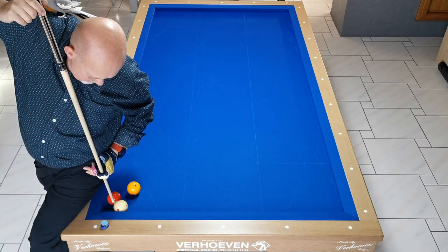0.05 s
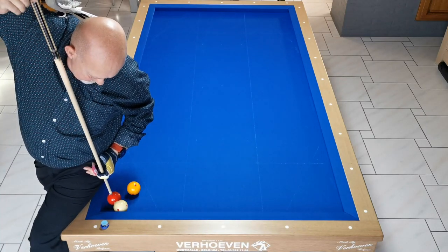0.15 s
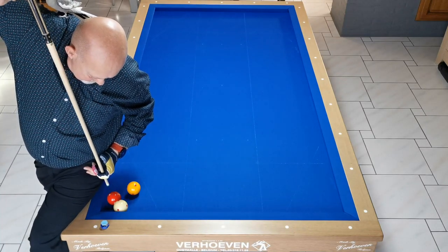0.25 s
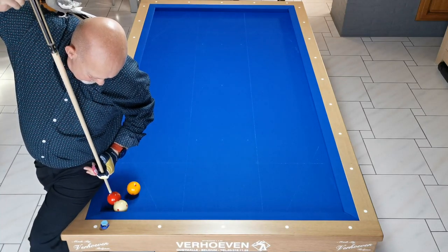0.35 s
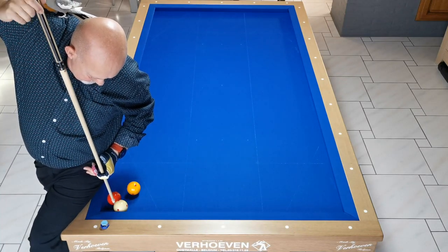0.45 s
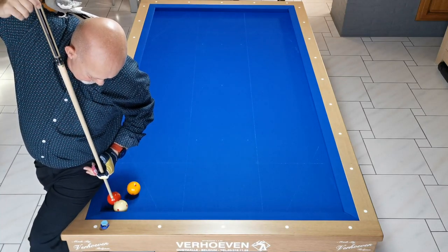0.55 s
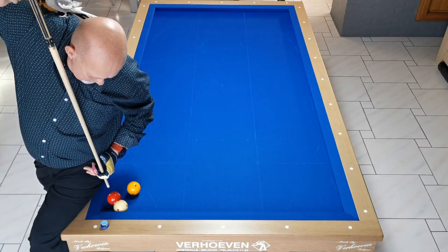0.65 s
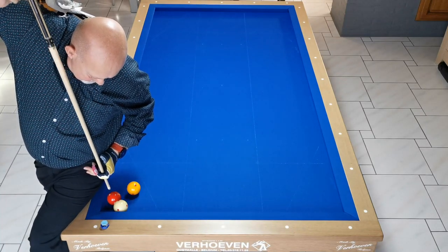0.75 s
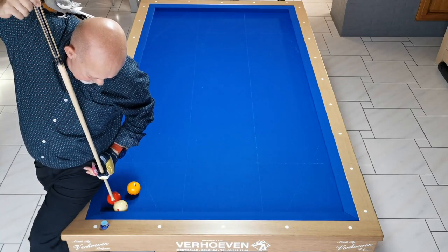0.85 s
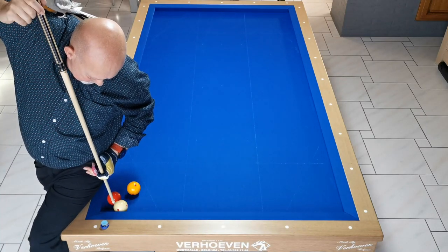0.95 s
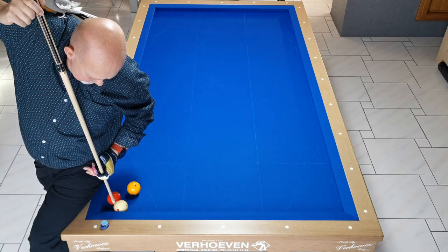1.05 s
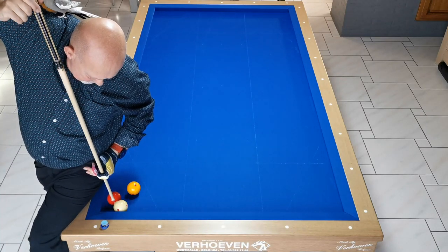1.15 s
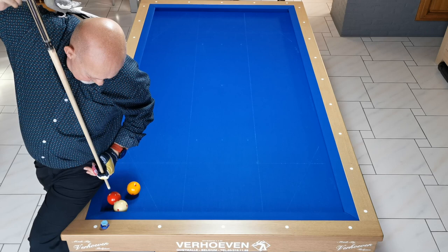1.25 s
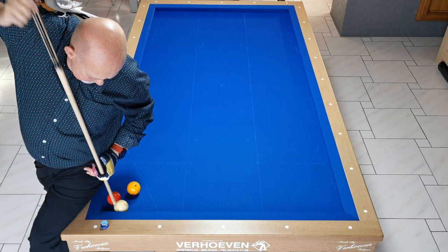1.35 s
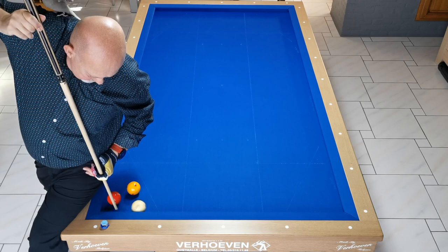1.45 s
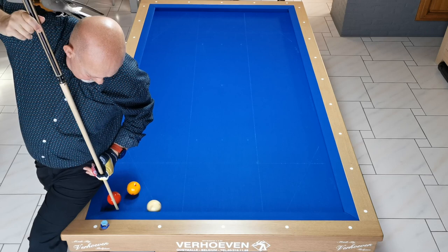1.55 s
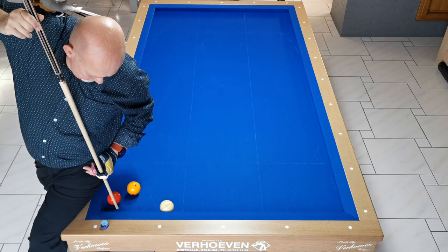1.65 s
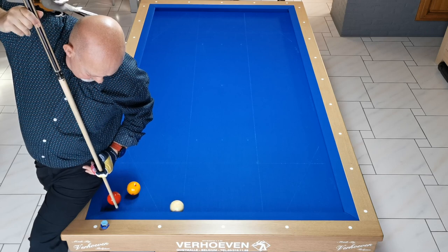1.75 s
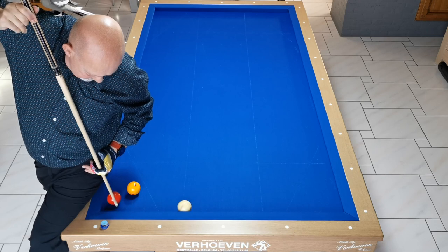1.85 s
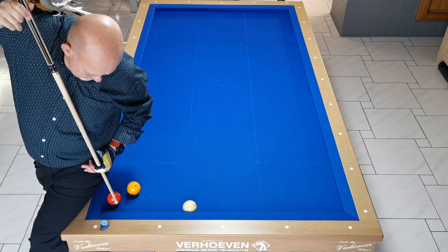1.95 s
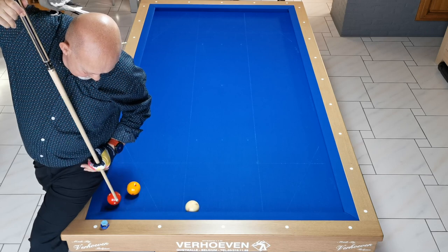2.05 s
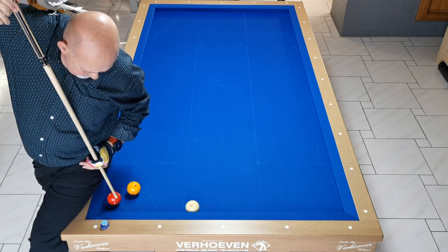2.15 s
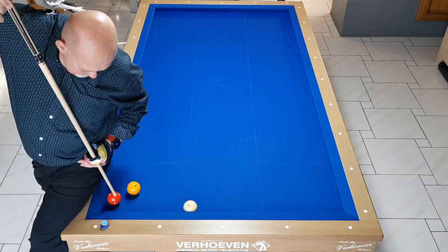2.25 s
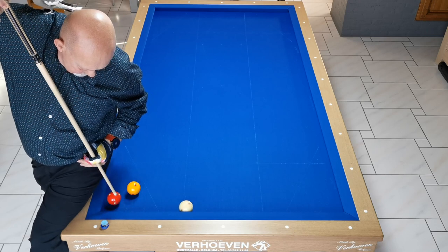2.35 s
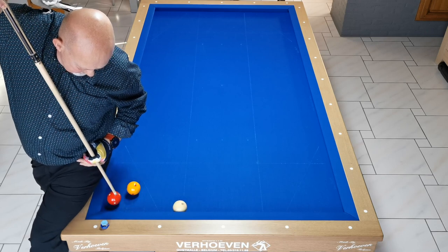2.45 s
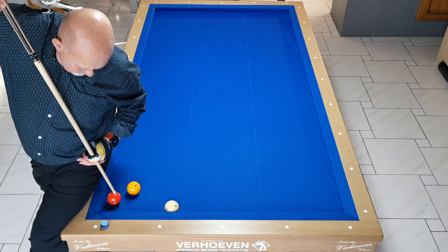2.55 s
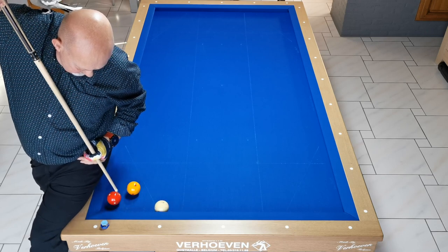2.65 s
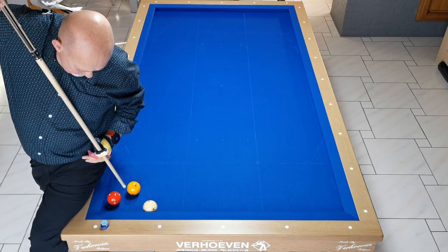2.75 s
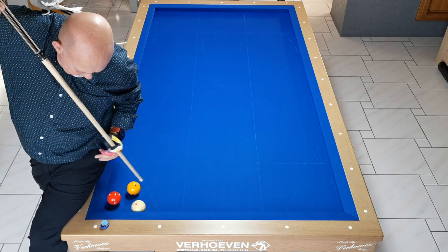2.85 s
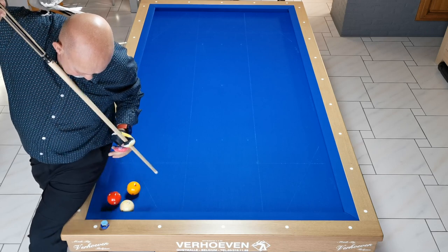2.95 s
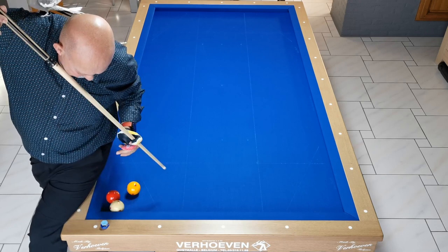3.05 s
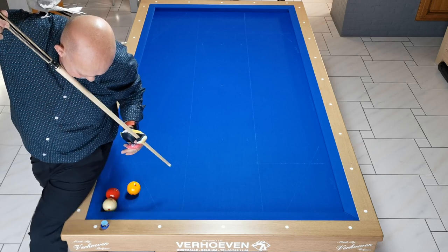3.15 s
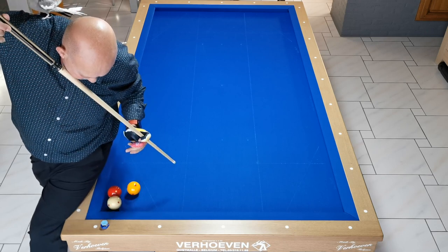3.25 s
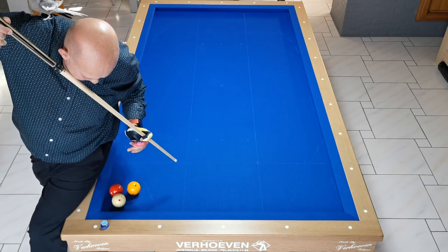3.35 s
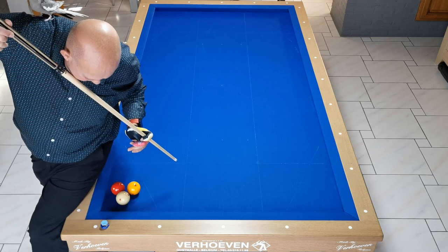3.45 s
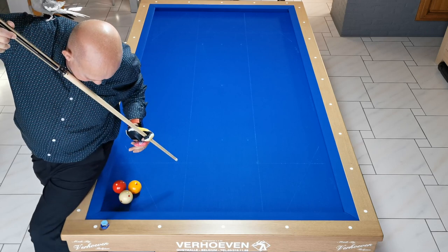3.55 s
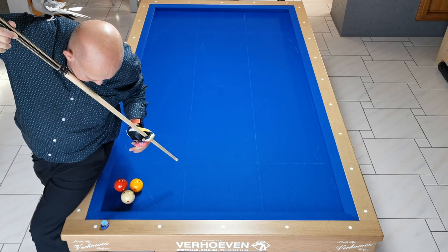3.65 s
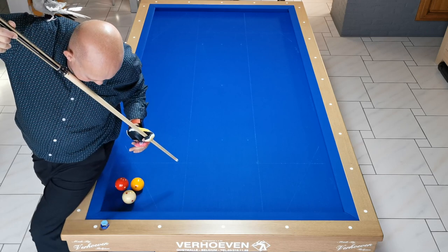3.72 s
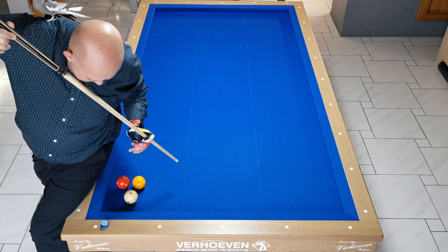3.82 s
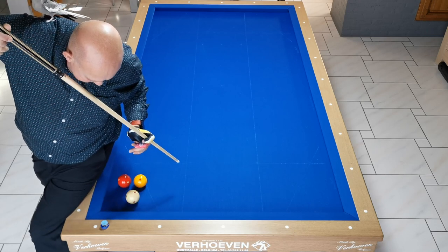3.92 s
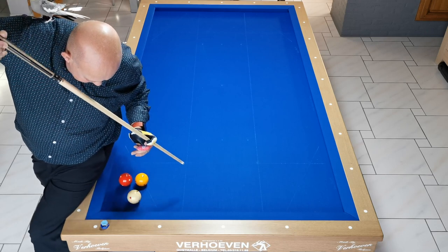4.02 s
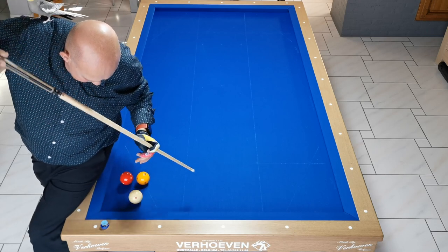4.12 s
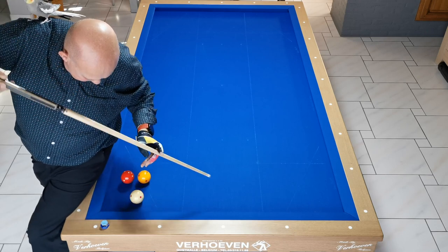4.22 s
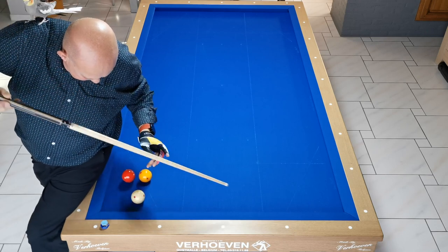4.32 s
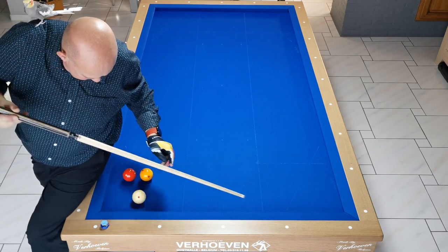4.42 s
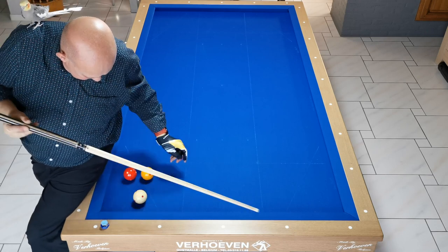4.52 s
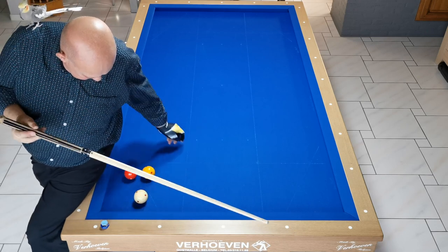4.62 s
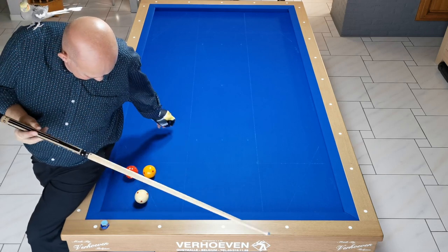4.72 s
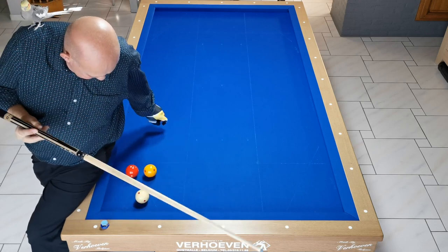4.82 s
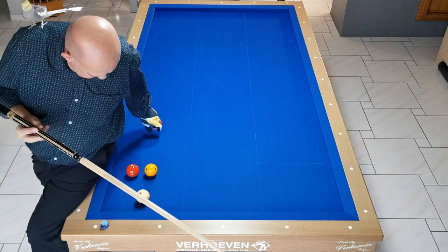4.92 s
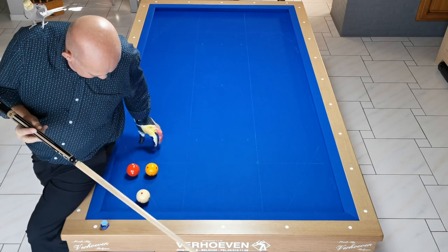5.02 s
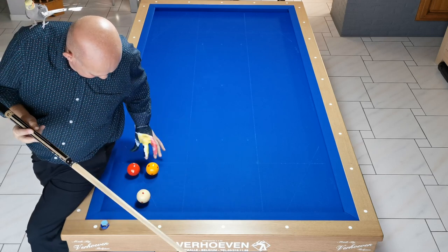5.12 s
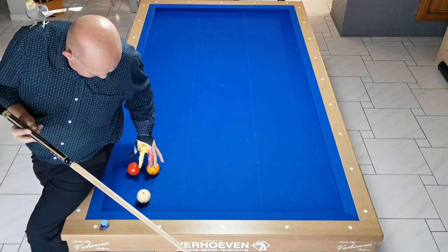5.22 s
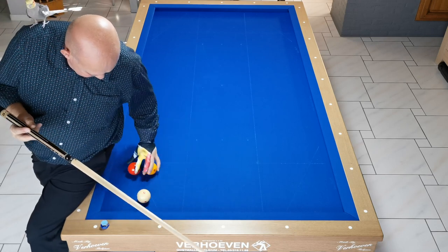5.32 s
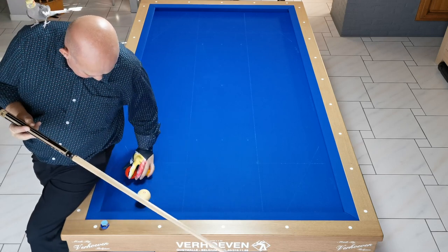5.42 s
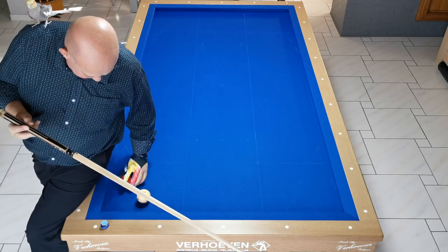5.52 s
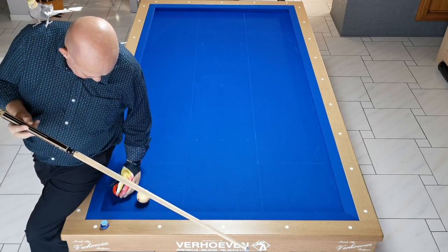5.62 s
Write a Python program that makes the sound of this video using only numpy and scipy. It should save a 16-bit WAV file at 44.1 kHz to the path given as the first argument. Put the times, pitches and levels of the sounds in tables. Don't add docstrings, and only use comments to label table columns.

```python
import sys
import numpy as np
from scipy import signal
from scipy.fft import rfft, irfft
from scipy.io import wavfile

SR = 44100
rng = np.random.default_rng(int(sys.argv[2]) if len(sys.argv) > 2 else 0)


def to_wav(sig):
    pcm = np.clip(np.atleast_2d(sig), -1, 1) * 32767
    pcm = np.round(pcm).astype(np.int16)
    wavfile.write(sys.argv[1], SR, pcm.T)


def level_to_linear(level):
    exponent = np.asarray(level, float) / 20
    return 10 ** exponent


N = 250488


def at_hz(points, hz):
    table_hz, values = np.array(points).T
    return np.interp(np.log(hz), np.log(table_hz), values)


def band(x, low_hz, high_hz, order=2):
    edges_hz = [low_hz, min(high_hz, .45 * SR)]
    return signal.sosfilt(signal.butter(order, edges_hz, "band", fs=SR, output="sos"), x)


def strike(times, levels_db):
    x = np.full(N, 1e-18)
    x[(np.asarray(times) * SR).astype(int)] = level_to_linear(np.asarray(levels_db))
    return x


def ring(clicks, modes):
    out = 0
    for k, (hz, level_db, t60) in enumerate(modes):
        decay = level_to_linear(-60 / (t60 * SR))
        turn = 2 * np.pi * hz / SR
        start = (-1) ** k * level_to_linear(level_db) * np.sin(turn)
        out = out + signal.lfilter([0, start], [1, -2 * decay * np.cos(turn), decay * decay], clicks)
    return out


def burst(s, level_db, low_hz, high_hz, t60):
    t = np.arange(N) / SR - s
    envelope = (t > 0) * level_to_linear(level_db - 60 * np.abs(t) / t60)
    return band(rng.standard_normal(N) * envelope, low_hz, high_hz, order=3)


def drift(rate):
    r = np.exp(-2 * np.pi * rate / SR)
    slow = signal.lfilter([1], [1, -2 * r, r * r], rng.standard_normal(N + SR))[SR:]
    return slow / slow.std()


def stereo_noise(count, spectrum):
    # f/Hz, likeness/0..1
    likeness = [(60, 1), (180, 1), (550, 0.24), (1650, 0.0712), (4970, 0.036), (15000, 0.034)]
    # f/Hz, level/dB
    lean = [(60, 3), (180, 3), (550, -1.5), (1650, -2.5), (4970, 2), (15000, -6)]
    hz = np.maximum(np.arange(count // 2 + 1) * SR / count, 1)
    mid, side = rfft(rng.standard_normal((2, count)))
    alike = np.clip(at_hz(likeness, hz), 0, 1)
    pair = np.sqrt(1 + alike) * mid + np.sqrt(1 - alike) * side * [[1], [-1]]
    colour_db = at_hz(spectrum, hz) + at_hz(lean, hz) * [[.5], [-.5]]
    out = irfft(pair * level_to_linear(colour_db), count)
    return out / out.std()


def room(x, wet_db, walls_db, linger=0.69, build_s=0.0028):
    # f/Hz, t60/s
    room_t60 = [(60, 0.2), (130, 0.6), (300, 0.47), (700, 0.55), (1500, 0.53), (3000, .6), (6000, 0.46),
                (10000, 0.34), (13000, .24), (16000, .15)]
    # delay/s, level/dB
    walls = [(.0065, 7), (.013, -25.5), (0.033, -19.5)]
    flat_noise = stereo_noise(SR, [(20, 0), (20000, 0)])
    hz, t, cells = signal.stft(flat_noise, SR, nperseg=1024)
    fading = cells * level_to_linear(-60 * t / linger / at_hz(room_t60, hz + 1)[:, None])
    tail = signal.istft(fading, SR, nperseg=1024)[1][:, :SR]
    tail = level_to_linear(wet_db) * tail * (1 - np.exp(-np.arange(SR) / SR / build_s))
    for delay, level_db in walls:
        for port in (0, 1):
            arrival = int((delay + rng.uniform(0, .0006)) * SR)
            tail[port, arrival] += level_to_linear(level_db + walls_db + rng.normal(0, 1.6))
    return signal.fftconvolve(x[None], tail, axes=1)[:, :N]


def direct(x, pan_db):
    late = np.interp(np.arange(N) - 0.00015 * SR, np.arange(N), x)
    return np.array([x * level_to_linear(pan_db / 2), late * level_to_linear(-pan_db / 2)])


def background():
    # f/Hz, level/dB
    mains = [(100, -64), (200, -85.5), (238, -85), (300, -85.5)]
    # f/Hz, level/dB per Hz
    air = [(15, -21.5), (21, 1.5), (32, -9.5), (46, -2), (58, -10.5), (72, -21), (140, -14.5), (270, -25.5),
           (310, -20.5), (500, -29.5), (1000, -33.5), (3000, -38), (11000, -42), (14500, -44), (16000, -55)]
    t = np.arange(N) / SR
    hum = sum(np.sqrt(2) * level_to_linear(level_db + 1.0 * drift(4.36)) * np.sin(2 * np.pi * hz * t)
              for hz, level_db in mains)
    return level_to_linear(-65) * stereo_noise(N, air) + direct(hum, 7.)


def small_noises():
    # t/s, level/dB
    tick_events = [
        (1.4359, -49),
        (1.445, -65),
        (4.576, -68),
    ]
    # f/Hz, level/dB, t60/s
    shaft = [(2600, -11, 0.0076), (3402, -6.5, 0.00499), (4992, -1.5, .003), (7200, -2.5, 0.0055),
             (8850, 1, .014), (11100, -2, 0.0068), (12490, -9.5, .008), (15000, -3.5, .002)]
    # t/s, level/dB, low f/Hz, high f/Hz, t60/s
    knock_events = [
        (.454, -44, 480, 830, .25),
        (.988, -50, 260, 480, .1),
    ]
    # t/s, length/s, level at full speed/dB
    strokes = [(-.1, 0.22, -79.5), (.17, 0.26, -76.5), (0.41, 0.25, -76), (0.629, .19, -78.5),
               (0.854, .22, -78), (1.259, .2, -80), (1.435, 0.055, -61.5), (2.741, 0.66, -74),
               (3.063, 0.37, -70), (3.326, 0.37, -73.5), (3.607, .25, -77), (4.17, 0.43, -77),
               (4.524, 0.59, -77.5), (5.08, .42, -82)]
    # f/Hz, level/dB per Hz
    slide_colour = [(1000, -1.5), (2000, 0), (3500, -0.5), (5000, 3), (7000, -3), (9000, -2), (11000, -0.5),
                    (14000, -23)]
    ticks = level_to_linear(8.0) * ring(strike(*np.transpose(tick_events)), shaft)
    knocks = sum(burst(*row) for row in knock_events)
    t, speed = np.arange(N) / SR, 0
    for s, length, level_db in strokes:
        done = np.clip((t - s) / length, 0, 1)
        speed = speed + level_to_linear(level_db) * np.abs(np.sin(np.pi * done)) ** 1.2
    flicker = level_to_linear(1.5 * drift(15))
    slide = speed * stereo_noise(N, slide_colour) * flicker
    near = direct(ticks + knocks, 6.1)
    return near + room(ticks + 2 * knocks, wet_db=-32.5, walls_db=-9.5) + slide


def chirps():
    # t/s, length/s, first f/Hz, last f/Hz, level/dB
    note_events = [
        (2.944, .095, 1510, 1940, -58),
        (3.039, .045, 1509, 1280, -56),
        (3.912, .106, 1446, 2370, -53),
    ]
    # f/Hz, level/dB
    chirp_colour = [(900, 10), (1300, 3), (2300, 0), (3000, 0.5), (4500, 0), (6000, -7.5), (7300, -3),
                    (9000, -7), (11000, -1.5), (13000, -21)]
    attack_s, release_s = 0.0072, 0.015
    swell_db_per_oct, grow_db = 10, 6
    overtone_db_per_oct, thinning_db_per_oct = -2, -23
    t, voice = np.arange(N) / SR, 0
    waver = 1 + .028 * drift(130)
    flutter = level_to_linear(3.5 * drift(80))
    rasp = band(rng.standard_normal(N), 2600, 10200)
    for s, length, first_hz, last_hz, level_db in note_events:
        falling = last_hz < first_hz
        progress = (t - s) / length
        hold = .42 if last_hz > first_hz else .02
        done = np.clip((progress - hold) / (1 - hold), 0, 1)
        glide = np.log2(last_hz / first_hz) * np.sin(np.pi / 2 * done) ** 2
        slope_db = overtone_db_per_oct + thinning_db_per_oct * np.abs(glide)
        if falling:
            slope_db = slope_db - 9 * done
        gate = np.clip(np.minimum((t - s) / attack_s, (s + length - t) / release_s), 0, 1)
        pitch = first_hz * 2 ** glide * waver
        phase = 2 * np.pi * np.cumsum(pitch) / SR
        stack = 0
        for k in range(1, 10):
            overtone_db = slope_db * np.log2(k) + at_hz(chirp_colour, k * pitch)
            stack = stack + level_to_linear(overtone_db) * np.sin(k * phase)
        stack = stack + level_to_linear(-18.5) * rasp * (1 + np.cos(phase))
        strength_db = level_db + swell_db_per_oct * glide + grow_db * np.clip(progress, 0, 1)
        voice = voice + stack * gate * level_to_linear(strength_db)
    voice = voice * flutter
    return direct(voice, -0.86) + room(voice, wet_db=-25.5, walls_db=-10.5, linger=1.0)


def balls():
    # t/s, peak level/dB, low push level/dB, hollow body level/dB, left-right level/dB
    click_events = [
        (3.1536, -21, -27, 2, -4),
        (3.6447, -26, -32, -8, -2),
        (5.4946, -14.5, -42, -12, -11.5),
        (5.5361, -16, -33.5, -20, -3),
    ]
    # f/Hz, level/dB, t60/s
    ball_modes = [(4200, 5.5, 0.0037), (6920, -1, 0.0047), (8740, 2.5, 0.0036), (11040, 4, 0.0049),
                  (13060, 4.5, 0.014)]
    # f/Hz, level/dB, t60/s
    contact = [(770, -3.5, 0.0047), (1296, 0.5, 0.0051), (1916, 2, 0.009), (2550, -1.5, 0.0032)]
    contact_lead_s, cloth_echo_s, cloth_echo_db = .0007, .0013, 0
    tick_db, tick_growth = -28, .7
    contact_top = signal.butter(8, 2850, fs=SR, output="sos")
    contact_low = signal.butter(2, 410, "high", fs=SR, output="sos")
    contact_band = np.vstack([contact_top, contact_low])
    out = 0
    for s, peak_db, push_db, body_db, pan_db in click_events:
        click = -strike([s - contact_lead_s], [peak_db])
        pulse = level_to_linear(-7.0) * signal.sosfilt(contact_band, ring(click, contact))
        tick = ring(strike([s], [peak_db]), ball_modes)
        pulse = pulse + level_to_linear(tick_db + tick_growth * (peak_db + 3.5)) * tick
        pulse = pulse + level_to_linear(push_db + 40) * band(click, 130, 150.6)
        bounced = pulse + level_to_linear(cloth_echo_db) * np.roll(pulse, int(cloth_echo_s * SR))
        hollow = band(ring(click, [(840, body_db, 0.0072)]), 590, 750)
        out = out + direct(bounced + hollow, pan_db)
        out = out + room(pulse, wet_db=-23.0, walls_db=-10.0, linger=0.95)
    return out


def blow():
    # t/s, peak level/dB
    blow_events = [
        (1.4917, 0),
        (1.4931, -0.5),
        (1.496, -1.5),
        (1.505, -9.5),
    ]
    # f/Hz, level/dB, t60/s
    table_modes = [(27.72, -30, 1.7), (44, -36.5, 0.65), (64.3, -28.5, 1.535), (56, -31.5, 0.37),
                   (72.78, -33.5, 0.44), (136.7, -21.5, 0.67), (238, -22.5, 0.2), (243.8, -26.5, .3),
                   (340, -32.5, 0.45)]
    # f/Hz, level/dB, t60/s
    cue_modes = [(475.2, -7, 0.0036), (710, -9.5, 0.013), (936, -14.5, 0.0084), (1210, -14, 0.014),
                 (1400, -10, 0.012), (1850, -8.5, 0.0063), (2792, -16.5, 0.0032), (3686, -21.5, 0.0029),
                 (6693, -26.5, 0.0011), (9960, -31, 0.0011)]
    # t/s, level/dB, t60/s
    tip_skid = (1.4902, -37, .045)
    rattle = strike(*np.transpose(blow_events))
    first = strike([blow_events[0][0]], [-3])
    skid_s, skid_db, skid_t60 = tip_skid
    skid = burst(skid_s, skid_db, 4900, 17500, skid_t60)
    crack = ring(rattle, cue_modes) + level_to_linear(11.0) * band(rattle, 110, 330) + skid
    spread = level_to_linear(4.5) * ring(first, cue_modes) - 0
    spread = spread + level_to_linear(27.5) * band(first, 110, 300.6) + level_to_linear(4.5) * band(first, 30, 90)
    spread = spread + level_to_linear(-11.0) * skid
    swell = signal.lfilter([.004], [1, -.996], first)
    slow_swell = signal.lfilter([.0015], [1, -.9985], swell)
    boom = ring(swell, table_modes[2:]) + ring(slow_swell, table_modes[:2])
    echoes = room(spread, wet_db=-22.5, walls_db=-12.5, linger=0.98)
    return direct(crack, 0.) + echoes + direct(level_to_linear(15) * boom, 5.3)


def scene():
    return background() + small_noises() + chirps() + balls() + blow()


def band_limit(x):
    return signal.sosfilt(signal.butter(12, 16820, fs=SR, output="sos"), x)


def record(dry):
    trimmed = signal.sosfilt(signal.butter(10, 16600, fs=SR, output="sos"), dry)
    return band_limit(trimmed)


dry = scene()
out = record(dry)
to_wav(out)
```